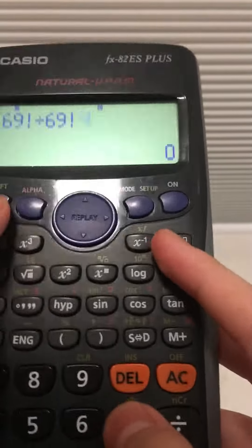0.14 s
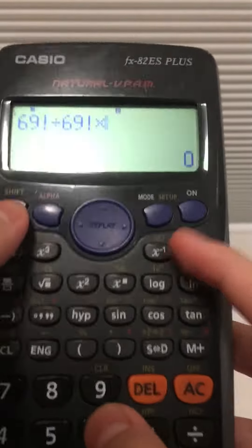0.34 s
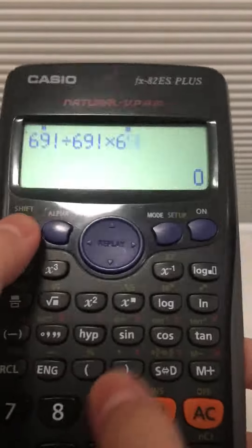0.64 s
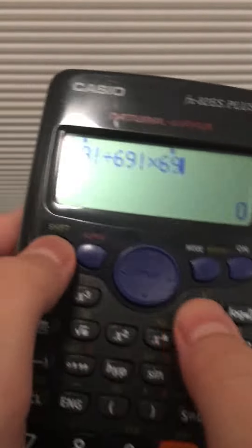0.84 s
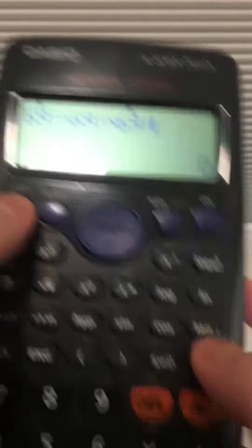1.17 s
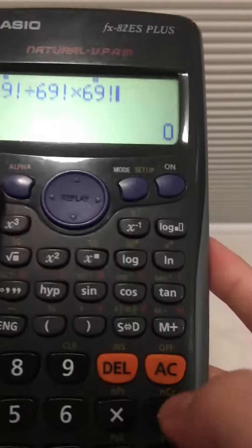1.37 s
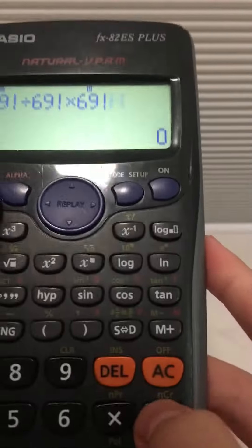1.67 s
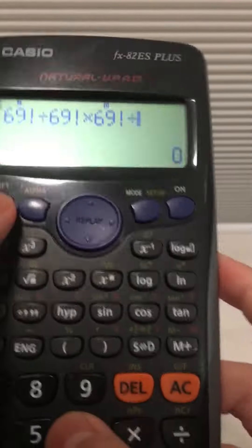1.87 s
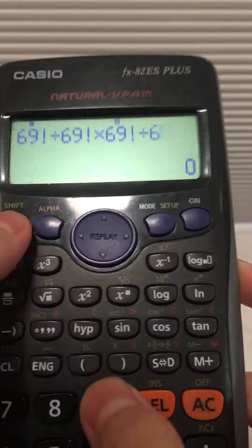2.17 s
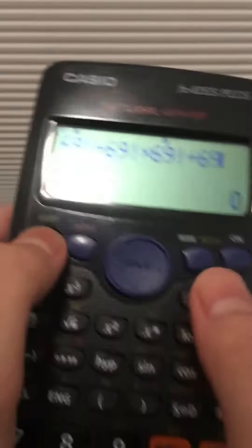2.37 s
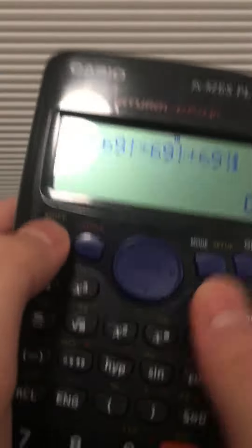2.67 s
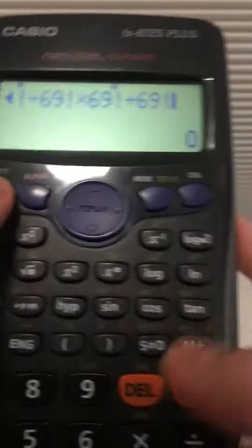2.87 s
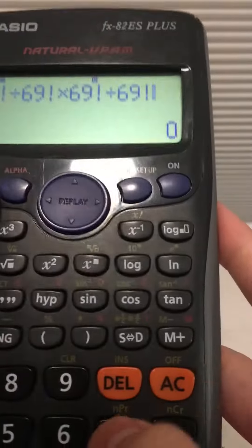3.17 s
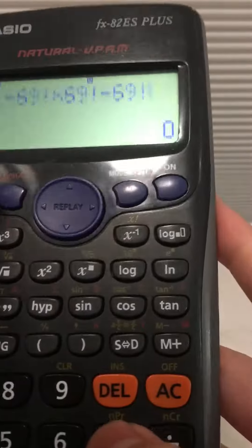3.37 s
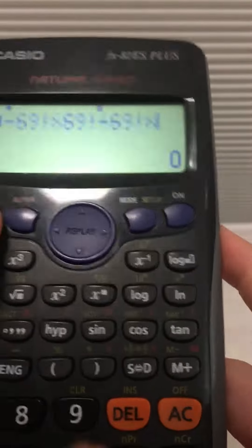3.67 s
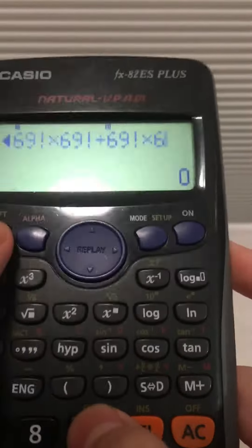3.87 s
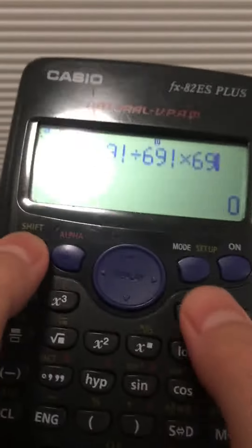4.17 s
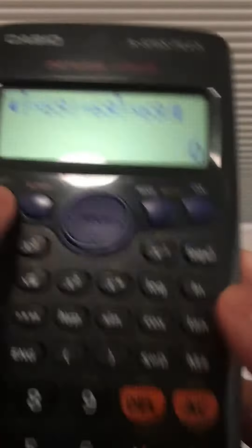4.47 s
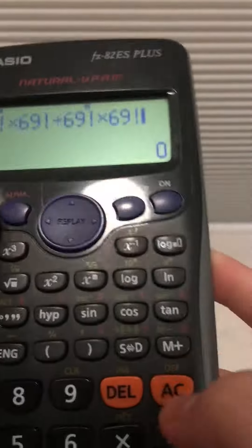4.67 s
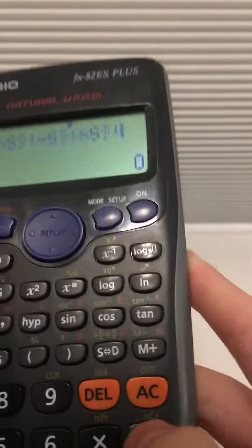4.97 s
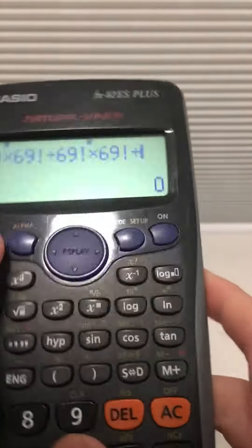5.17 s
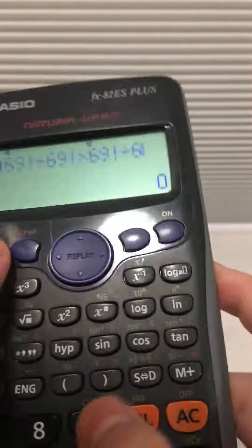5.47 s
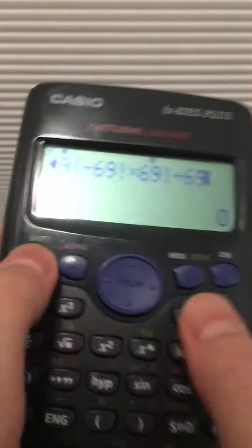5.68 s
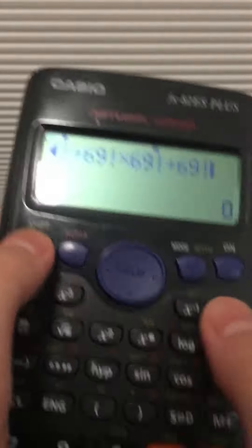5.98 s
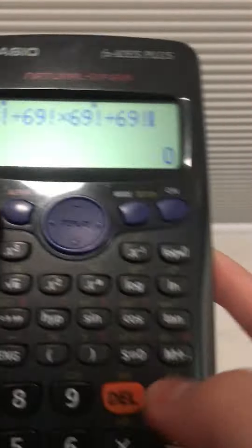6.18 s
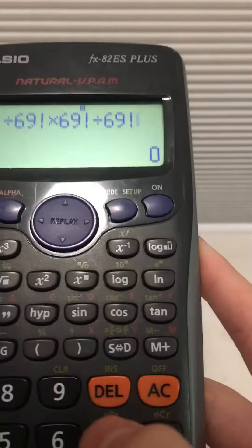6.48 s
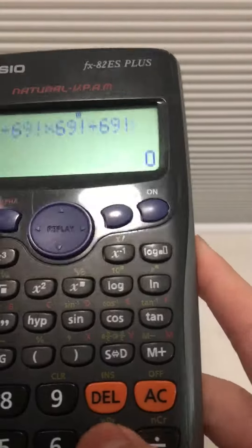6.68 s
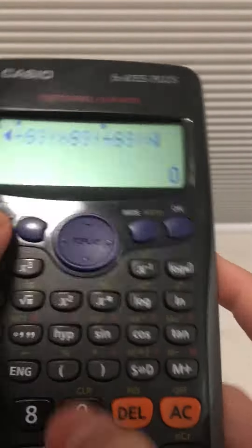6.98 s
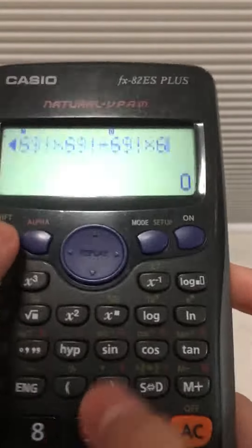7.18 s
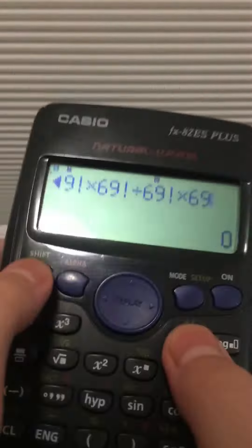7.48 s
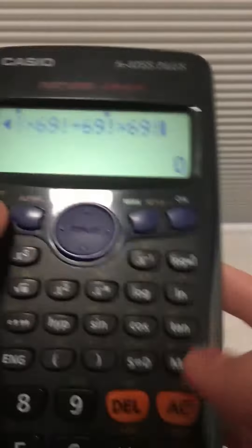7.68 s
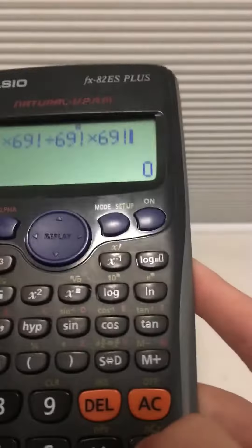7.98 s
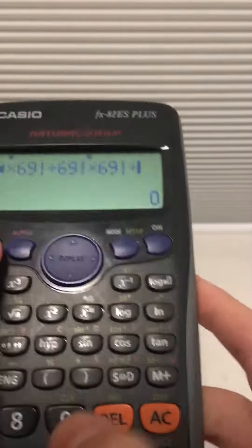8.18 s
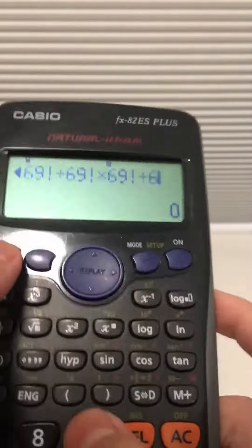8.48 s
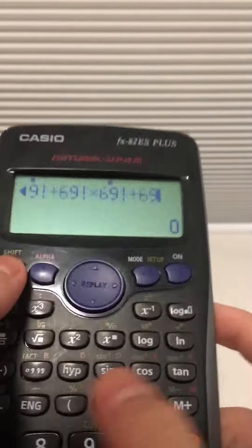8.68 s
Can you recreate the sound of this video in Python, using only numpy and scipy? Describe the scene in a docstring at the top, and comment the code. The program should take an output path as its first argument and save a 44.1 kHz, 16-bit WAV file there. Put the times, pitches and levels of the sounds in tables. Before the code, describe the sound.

Quick, sharp plastic key clicks on a handheld calculator, close up, over steady low ventilation rumble, with a far rough motor-like tone swelling later.

```python
"""Fingers press and release the plastic keys of a handheld calculator close to a phone in a small furnished room.
From the start ventilation rumble stands in the room's low modes; a thin high whine is much fainter at 1.2-1.7 s.
From 0.1 s each key contact rattles briefly and rings the case; one wall echo and a short tail answer, and faint
fingertip ticks fall at chance moments. From 0.66 s come dull rubs and low thumps; from 2.2 s four clicks are
followed by a buzz. From about 4.3 s a far tone swells, grows rougher and later slides down."""
import sys
import numpy as np
from scipy import signal
from scipy.fft import rfft, irfft
from scipy.io import wavfile
from scipy.ndimage import uniform_filter1d

SR = 44100
rng = np.random.default_rng(int(sys.argv[2]) if len(sys.argv) > 2 else 0)


def dump_mix(stems):
    """Bounce the given channels to the path in sys.argv[1] as a 16-bit WAV at rate SR."""
    frames = np.atleast_2d(stems).T  # one column per channel
    limited = np.clip(frames, -1, 1)  # hard clip at full scale
    pcm = np.round(limited * 32767).astype(np.int16)
    wavfile.write(sys.argv[1], SR, pcm)


N = 389844


def undb(db):
    """Decibels to gain."""
    return 10 ** (np.asarray(db) / 20)


def curve(table):
    """Columns of a table drawn as straight lines over time."""
    s, *columns = np.transpose(table)
    return [np.interp(np.arange(N) / SR, s, column) for column in columns]


def walk(rate):
    """Smooth random wander: levels held 1 / rate s and slewed twice; spread near 1."""
    hold = int(SR / rate)
    steps = np.repeat(rng.standard_normal(N // hold + 1), hold)
    return 1.7 * uniform_filter1d(uniform_filter1d(steps, hold), hold)[:N]


# Ventilation and microphone hiss, before standing waves and swell.
# Each row: frequency in Hz, level in dB per Hz.
AIR_SPECTRUM = [(20, -108), (33, -92.5), (41, -73), (130, -72), (400, -81), (520, -88), (710, -87),
                (1310, -96.5), (1980, -97), (2500, -102), (3500, -107), (5000, -117), (6000, -113),
                (7600, -119), (9500, -118), (10300, -123), (11800, -119), (15650, -120), (15850, -155)]
# Standing waves of the room. Each entry: frequency in Hz.
STANDING_WAVE_HZ = (55, 92, 120, 151, 169, 245, 290, 328, 350, 400, 494, 560, 700, 1058, 1481)
# Their shapes, in the same order. Each row: width in Hz (at a quarter of the peak power),
# peak level in dB against the air noise.
STANDING_SHAPES = [(17.3, 9.5), (9, 12.5), (4.6, 10.5), (4.94, 11), (6.2, 9.5), (16.9, 8.5), (15.1, 8),
                   (4.97, 6), (8.9, 7), (20, 8), (6, 5.5), (4.7, 5.5), (12.42, 5.5), (40, 3), (16, 8)]
# Slow swell of the ventilation. Each row: time in seconds, rumble gain in dB,
# upper air gain in dB before its random wander.
AIR_SWELL = [(0, -.5, 2), (1, -1.5, 0.9), (2.2, 1.4, 2.5), (4, 2, 1), (5, -0.9, 1.1), (6, 1.5, 1.5),
             (7.6, 2, 4), (8.65, 4.5, 2.1), (8.84, 2.5, 1)]


def air():
    """Air noise, lifted where the room's standing waves build up; rumble and upper air swell separately."""
    f = np.fft.rfftfreq(N, 1 / SR) + 1e-3  # never zero, so its logarithm exists
    hz, db = np.transpose(AIR_SPECTRUM)
    power = 1
    for centre, (width, peak_db) in zip(STANDING_WAVE_HZ, STANDING_SHAPES):
        power = power + undb(peak_db) ** 2 / (1 + (2 * (f - centre) / width) ** 2) ** 2
    spectrum = undb(np.interp(np.log(f), np.log(hz), db)) * np.sqrt(power * SR / 2)
    shaped = rfft(rng.standard_normal(N)) * spectrum

    # split softly near 450 and 3500 Hz; the part above keeps a steady level
    low = 1 / (1 + (f / 450) ** 4)
    high = 1 / (1 + (3500 / f) ** 4)
    rumble_db, upper_db = curve(AIR_SWELL)
    rumble = irfft(shaped * low, N) * undb(rumble_db)
    upper = irfft(shaped * (1 - low - high), N) * undb(upper_db + .7 * walk(7.4))
    hiss = irfft(shaped * high, N)
    return rumble + upper + hiss


WHINE_HZ, WHINE_DB, WHINE_DIP_DB, WHINE_FADE_S = 14967, -85.5, -21.5, .15
# Where the whine is much fainter. Each row: start in seconds, end in seconds (middles of the fades).
# The second row ends before it starts, so it leaves the whine untouched.
WHINE_DIPS = [(1.22, 1.7), (8.05, 7.9)]


def whine():
    """A faint electronic tone near the top of hearing, wavering slightly; its level dips for a while."""
    t = np.arange(N) / SR
    dip = np.zeros(N)  # 0 is full level, 1 is faintest
    for start, end in WHINE_DIPS:
        dip += np.clip(np.minimum(t - start, end - t) / WHINE_FADE_S + .5, 0, 1)
    db = WHINE_DB + WHINE_DIP_DB * dip + 1.5 * walk(10)
    phase = 2 * np.pi * np.cumsum(WHINE_HZ + 2.5 * walk(8)) / SR
    return np.sqrt(2) * undb(db) * np.sin(phase)


def fidget(count=20, db=-71.0, spread_db=4.0, rattle_ms=3.0, body_db=4.0, edge_db=-9.0):
    """Faint ticks at chance moments as fingertips shift on the case, as rows like those of KEY_CONTACTS."""
    chance = rng.random((count, 2))
    return [(N / SR * when, db + spread_db * (2 * loud - 1), rattle_ms, body_db, edge_db)
            for when, loud in chance]


FIRM_DB = -42.5  # presses firmer than this bottom out
HOLLOW_PER_DB, TOP_PER_DB = 0.43, .2  # what the hollow and the top gain per extra dB


def shares(db, body_db, edge_db):
    """Levels of the seven mode families against the click: fuller presses bring lows, harder edges highs."""
    firm_db = max(db - FIRM_DB, 0)
    thump = -7 + .7 * body_db
    hollow = -11 + body_db + HOLLOW_PER_DB * firm_db
    shell = body_db
    click = 0
    crack = 0.1 + .45 * edge_db
    sizzle = edge_db
    top = -4.5 + 1.3 * edge_db + TOP_PER_DB * firm_db
    return thump, hollow, shell, click, crack, sizzle, top


# Key contacts. Each row: start in seconds, level of the click family (2.8-4.8 kHz) in dB,
# rattle length in milliseconds, body in dB against the click, edge in dB against the click.
KEY_CONTACTS = [(.0951, -57, 3.5, 5.5, -6), (.1047, -52, 3, -5, -12), (.119, -53, 2.2, -2, -21),
                (.1351, -61, 2.2, 3, -14), (.2308, -59, 3.2, 3, -13), (.2444, -51.5, 5.2, -1, -12),
                (.256, -66, 3.1, 6, -10), (.293, -65, 2.5, -12, -20), (.3066, -61, 4.5, 4, -12),
                (.3521, -48.5, 0.98, -2, -15), (.3783, -57, 3.4, 4, -6), (.3861, -38, 0.55, 5, 1),
                (.4711, -58.5, 0.87, 6, -15), (.4749, -48.5, 4, 2, -14), (.4946, -54, 1.3, -7, -10),
                (.6139, -52, 1.65, 5.5, -2), (.857, -62.5, 2.6, -6, -14), (.9804, -56, 3, -3, -5),
                (1.0053, -54.5, 1.3, -3, -9), (1.0263, -57, 1.7, -8, -16), (1.0393, -41, 3.6, -1.5, -6),
                (1.208, -72.5, 3.1, 13, -7), (1.505, -62, 3.1, -3, -13), (1.6538, -45.5, 4, 3, -10),
                (1.6647, -51, .94, 7, -12), (1.673, -28, 1.3, -2.5, 4), (1.812, -67, 3.1, 12, -14),
                (1.822, -68, 3.1, 5, -10), (1.856, -70, 3.1, 1, -14), (1.9378, -48.5, 0.47, -0.5, -20),
                (1.9444, -52, 1.4, -7, -5), (1.96, -32, 0.61, -4, -11), (2.0378, -56.5, 2.2, 7, -4),
                (2.0438, -42.5, 2.9, 2, -9.5), (2.1455, -42.5, 2.3, 4, -5), (2.1667, -39.5, 3.3, -0.5, -1),
                (2.4064, -57.5, 1.7, -1, -14), (2.4265, -60.5, 2.5, -2, -10.5),
                (2.4384, -49.5, 1.9, 4, -4.5), (2.607, -49.5, 1.9, -2.5, -8), (2.6298, -59, 2.2, 4, -9),
                (2.6335, -48.5, 1.6, -6, -9), (2.6395, -58, 2, 3, -19), (3.1526, -68, 1.2, 7, -2),
                (3.226, -69, 1.9, 4.5, -7.5), (3.3511, -68, 1.1, 7, -22), (3.3554, -68, 2.1, 13, -17),
                (3.376, -58, 5.8, -4, -10), (3.3905, -48.5, 0.81, 3, -23), (3.3942, -43, 3.5, -9, -16),
                (3.4024, -49, 0.91, 0, -20), (3.4141, -46, 2.9, -7, -23), (3.5123, -56.5, 2.4, 9, -14),
                (3.5163, -44.5, 1.9, 0, -12), (3.618, -62, 3.1, 4, -11), (3.6427, -41, 3.9, -7, -15),
                (3.656, -33, 2.05, 5, -0.5), (3.7335, -55, 5.9, 4.5, -14), (3.7406, -58, 1.9, -3, -14),
                (3.7535, -56, 0.75, 10, -13), (3.8378, -43, 1.2, 1, -9), (3.865, -42, 3.5, 5.5, 2.5),
                (3.955, -50, 1.8, -4, -5.5), (3.968, -62, 2.5, -1, -8), (4.1774, -51, 2.7, -10, -3),
                (4.2007, -54.5, 0.91, -6, -18), (4.3252, -47.5, 3.7, -10, -15),
                (4.3344, -44, 0.78, -6.5, -4), (4.3586, -42, 0.76, -1, -0.5), (4.9367, -54.5, 1.3, -8, -6),
                (4.9613, -49, 4, 7, -9), (4.9779, -54, 2.2, 6, -10), (4.9806, -37, 4.7, -7.5, -5),
                (5.1004, -56, 2.6, -1, -22), (5.1144, -45.5, 3.3, 2, -20), (5.161, -44.5, 0.54, -7.5, -16),
                (5.217, -62, 3.1, -7, -18), (5.2406, -42, 1.5, 0.5, -11), (5.2587, -41.5, 3.5, -1, -14),
                (5.3333, -43.5, 4.1, 5.5, -9.5), (5.3412, -62, 5.5, 9, -12), (5.426, -42.5, 2, 2.5, -8),
                (5.443, -53, 3.9, 2, -14), (5.4558, -41.5, 2.5, 1, -2.5), (5.539, -67, 3.9, 8, -10),
                (5.6957, -52, 1.3, 4, -2), (5.7093, -53, 6.3, -7, -14), (5.858, -50.5, 1.9, -8, -18),
                (5.8851, -47, 2.8, -3, -16), (5.8928, -61, 4.7, -1, -13), (5.9147, -66, 2, -4, -1),
                (6.498, -54.5, 2.2, 1.5, -9), (6.5324, -55, 4, 5, -11), (6.6856, -54, 3.3, 3, -13),
                (6.691, -40.5, 2.6, -5.5, -13), (6.7219, -42, 2.4, -3, -5.5), (6.8076, -52, 3.3, 0, -16),
                (6.8138, -49.5, 2.2, 6, -10), (6.8665, -58, 1.6, 3, -20), (6.8793, -54, .7, -1, -17),
                (6.9087, -48, 4.4, 4, -10), (6.918, -58, 6.3, 7, -12), (6.9237, -33.5, 1.5, -1, -3.5),
                (7.0113, -51.5, 4, 6.5, -5), (7.0169, -47, 2.1, -6, -17), (7.0307, -58, 2.65, 6.5, -15),
                (7.1014, -52.5, 1.35, 6, -25), (7.129, -64, 3.2, 11.5, -16), (7.155, -65, 3.7, 8, -10),
                (7.222, -70, 3.1, 1, -13), (7.255, -66.5, 3.1, -1, -12), (7.3451, -51, 1.1, -12, -1.5),
                (7.366, -56, 2.2, 0, -19), (7.401, -55, 3.8, -9, -15), (7.4256, -63, 1.5, 8, -6),
                (7.4345, -53.5, 1.8, -7, -11), (7.5028, -52, 3.6, -3, -11), (7.5084, -45.5, 1, -5.5, -3.5),
                (7.5207, -46, 1.1, -1.5, -7), (7.5263, -59, 1.8, 3, -1), (7.9359, -56, 1.1, -20, -6),
                (8.0549, -60, 1.2, 7, -24.5), (8.101, -41.5, 2.6, -1, -16), (8.1155, -33.5, 4.1, -3, 1.5),
                (8.229, -65, 4.1, -1, -12), (8.3532, -55, 1.1, -4, -16), (8.3822, -54, 4.7, 6, -6),
                (8.3876, -38, 1.3, -14, 0), (8.3928, -33.5, 1.8, -2, -35), (8.4657, -49, 2.7, 4.5, -5),
                (8.4701, -51, 1.6, 3.5, -12), (8.5884, -42.5, 1, -1.5, -15), (8.615, -41, 3, 4.5, 0)]
# What the case and keys ring with. Each row: frequency in Hz, level in dB against the other modes
# of its family, time to fade by 60 dB in seconds.
CASE_MODES = [(670, -3, 0.013), (806, 0.5, 0.012), (1064, 2, .055), (1436, -4, 0.042), (1780, 6, 0.018),
              (2080, 7, 0.005), (3148, -0.5, 0.015), (3860, 4.5, 0.0038), (4330, -2.5, 0.016),
              (5255, -7.5, 0.0018), (6020, -1.5, 0.0032), (7460, 8, 0.0019), (9000, 8, 0.0026),
              (11600, 1.5, 0.015), (11550, -5.5, 0.0057), (14040, 1.5, 0.0023), (15300, 1, 0.0033)]
# Where one mode family ends and the next begins. Each entry: frequency in Hz.
FAMILY_EDGES_HZ = (930, 1300, 2800, 4800, 6800, 11800)
RATTLE_FALL = 1.9  # how abruptly a rattle ends


def keys(scatter_db=2.0, detune=0.052, blur_s=0.0004, rise=0.42, knocks=.3, push_cycles=0.64,
         size=2600, count=300):
    """Each contact is a rattle of tiny knocks that rings the case; gives the near sound and what the room hears."""
    hz, mode_db, t60 = np.transpose(CASE_MODES)
    family = np.searchsorted(FAMILY_EDGES_HZ, hz)
    t = np.arange(size) / SR
    window = SR // 200  # levels hold for the first 5 ms
    out = np.zeros((2, N + size))
    for s, db, rattle_ms, body_db, edge_db in list(KEY_CONTACTS) + fidget():
        chance = rng.standard_normal((2, len(hz)))
        # the rattle builds at once and dies within about its length; only some instants hold a knock
        x = t[:count] / (max(rattle_ms, .3) / 1000)
        rattle = rng.standard_normal((len(hz), count)) * (rng.random(count) < knocks)
        rattle[:, 2] += 1  # an early knock shared by all modes
        rattle *= x ** rise * np.exp(-RATTLE_FALL * x ** 2)

        # plastic yields: a knock needs part of a cycle to load each mode, so the lows come late
        f = (hz * (1 + detune * np.clip(hz / 3000, 0, 1) ** 2 * chance[0]))[:, None]
        load = np.sin(np.pi / 2 * np.clip(f * t / push_cycles, 0, 1)) ** 2
        fade = np.exp(-np.log(1000) * t / t60[:, None])
        one_knock = load * fade * np.sin(2 * np.pi * f * t)
        near = signal.fftconvolve(one_knock, rattle, axes=1)[:, :size]

        # the room sums the case from all sides, which blurs the modes into an even colour
        signs = (-1) ** np.arange(len(hz))[:, None]
        blurred = one_knock * np.exp(-t / blur_s) * signs
        rings = np.array([near, blurred])
        rings *= undb(mode_db)[:, None] / rings[..., :window].std(axis=2, keepdims=True)
        # the near sound's mode levels vary by chance from contact to contact
        rings[0] *= undb(scatter_db * chance[1])[:, None]

        start = int(s * SR)
        for k, share_db in enumerate(shares(db, body_db, edge_db)):
            ring = rings[:, family == k].sum(axis=1)
            gain = undb(db + share_db) / ring[:, :window].std(axis=1, keepdims=True)
            out[:, start:start + size] += ring * gain
    # a small case radiates no bass
    no_bass = signal.butter(3, 520, "high", fs=SR, output="sos")
    return signal.sosfilt(no_bass, out[:, :N])


# Room tail by band. Each row: band centre in Hz, level in dB of the noise the band is cut from,
# time to fade by 60 dB in seconds.
ROOM_TAIL = [(700, -11, 0.16), (1500, -12.5, .22), (3000, -11, 0.17), (6000, -14.5, 0.23),
             (11000, -9.5, 0.15), (15000, -13.5, .15)]
WALL_S, WALL_DB = .0148, -27  # delay and level of the wall echo


def room(x):
    """One clear echo from the near wall over a diffuse tail whose bands fade at their own rates."""
    t = np.arange(SR // 2) / SR
    f = np.fft.rfftfreq(len(t), 1 / SR)
    hz, db, t60 = np.transpose(ROOM_TAIL)
    noise = rfft(rng.standard_normal(len(t)))
    below_top = f < AIR_SPECTRUM[-1][0]
    tail = np.zeros(len(t))
    for k in range(len(hz)):
        # each band fades over into its neighbours
        weight = np.interp(np.log(f + 1), np.log(hz), np.arange(len(hz)) == k)
        band = irfft(noise * weight * below_top)
        fall = np.exp(-np.log(1000) * t / t60[k])
        tail += undb(db[k]) * band * fall / np.sqrt(np.sum(fall ** 2))
    tail *= np.clip(t / 0.0024, 0, 1)  # the first reflections need a few ms to arrive
    tail[int(WALL_S * SR)] += undb(WALL_DB)
    return signal.fftconvolve(x, tail)[:N]


# Low thumps under key contacts (the shortest rows) and longer dull rubs of the hand.
# Each row: middle in seconds, length at half height in seconds, centre frequency in Hz,
# rms level in dB before the rise and fall.
RUBS_AND_THUMPS = [(0.663, 0.028, 1600, -62), (1.675, .005, 751, -38), (2.539, 0.037, 2520, -63),
                   (3.228, 0.01, 895, -49), (3.353, .006, 1000, -47), (3.741, 0.043, 375, -48),
                   (4.207, 0.039, 730, -52), (5.342, 0.0056, 1000, -47), (6.534, 0.0052, 1100, -43),
                   (7.367, 0.035, 784, -57.5), (8.056, 0.0053, 900, -46), (8.118, 0.007, 800, -37),
                   (8.697, 0.14, 411.6, -49)]


def rubs_and_thumps():
    """Low thumps under key contacts, and longer dull rubs of the hand; noise bursts an octave wide."""
    out = np.zeros(N)
    for s, length, hz, db in RUBS_AND_THUMPS:
        size = int(2 * length * SR)
        octave = [hz / np.sqrt(2), hz * np.sqrt(2)]
        sos = signal.butter(2, octave, "band", fs=SR, output="sos")
        burst = signal.sosfilt(sos, rng.standard_normal(SR // 2))[-size:]
        start = int((s - length) * SR)
        out[start:start + size] += undb(db) * np.hanning(size) * burst / burst.std()
    return out


# Four key clicks are followed by a buzz, perhaps from one key.
# Each row: start in seconds, rms level in dB before the swell and fade.
KEY_BUZZES = [(2.168, -64), (3.8665, -55), (5.457, -60), (8.616, -63)]
BUZZ_HZ, BUZZ_WIDTH_HZ, BUZZ_T60_S, BUZZ_SWELL_S = 4230, 450, 0.23, .008


def springs(size=8000):
    """A grainy, pitched buzz that outlasts the click: a narrow band of noise that swells and fades."""
    t = np.arange(size) / SR
    out = np.zeros(N + size)
    band = [BUZZ_HZ - BUZZ_WIDTH_HZ / 2, BUZZ_HZ + BUZZ_WIDTH_HZ / 2]
    sos = signal.butter(2, band, "band", fs=SR, output="sos")
    shape = (1 - np.exp(-t / BUZZ_SWELL_S)) * np.exp(-np.log(1000) * t / BUZZ_T60_S)
    for s, db in KEY_BUZZES:
        buzz = signal.sosfilt(sos, rng.standard_normal(size))
        start = int(s * SR)
        out[start:start + size] += undb(db) * shape * buzz / buzz.std()
    return out[:N]


# Far drone; it holds its faint first level until the first row.
# Each row: time in seconds, pitch in Hz before a slight wander, approximate rms level in dB.
DRONE_PATH = [(4.3, 291, -73.5), (4.9, 289, -53.5), (5.9, 292.5, -51), (6.2, 295.7, -56),
              (6.8, 281.3, -48.5), (7.2, 274.7, -43.5), (7.6, 271.7, -54), (7.95, 263.1, -45),
              (8.3, 263, -52), (8.84, 258.7, -51.5)]
DRONE_ROUGH, ROUGH_PER_S = .3, 0.099  # roughness (0-1) at the first row, and its growth per second


def drone():
    """A far motor-like tone that swells, grows rougher and slides down near the end."""
    hz, db = curve(DRONE_PATH)
    since_entry = np.arange(N) / SR - DRONE_PATH[0][0]
    rough = np.clip(DRONE_ROUGH + ROUGH_PER_S * since_entry, 0, 1)
    phase = 2 * np.pi * np.cumsum(hz + 1.5 * walk(8)) / SR
    # roughness trades the steady tone for one whose size and phase wander quickly
    steady = np.sqrt(2 * (1 - rough ** 2)) * np.sin(phase)
    wander = walk(30) * np.sin(phase) + walk(30) * np.cos(phase)
    return undb(db) * (steady + rough * wander)


def scene():
    """Background, keys with their room, rubs and thumps, buzzes and the drone, added up."""
    near, around = keys()
    mix = air() + whine() + near + room(around) + rubs_and_thumps() + springs() + drone()
    return mix[None, :]


TOP_HZ = 16500


def record(dry):
    """A steep low-pass filter ends the sound at about 16.5 kHz."""
    sos = signal.ellip(8, .2, 70, TOP_HZ, fs=SR, output="sos")  # 0.2 dB ripple, 70 dB cut
    return signal.sosfilt(sos, dry)


dry = scene()
out = record(dry)
dump_mix(out)
```